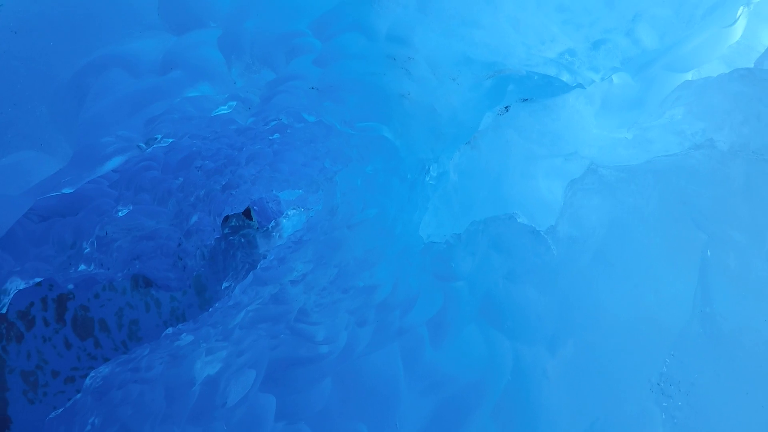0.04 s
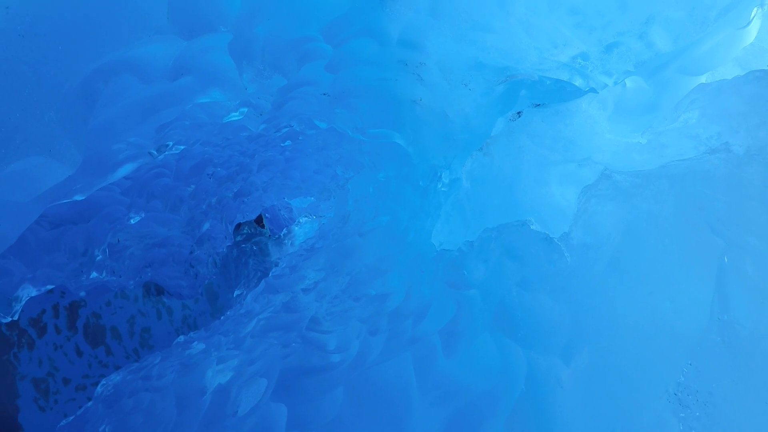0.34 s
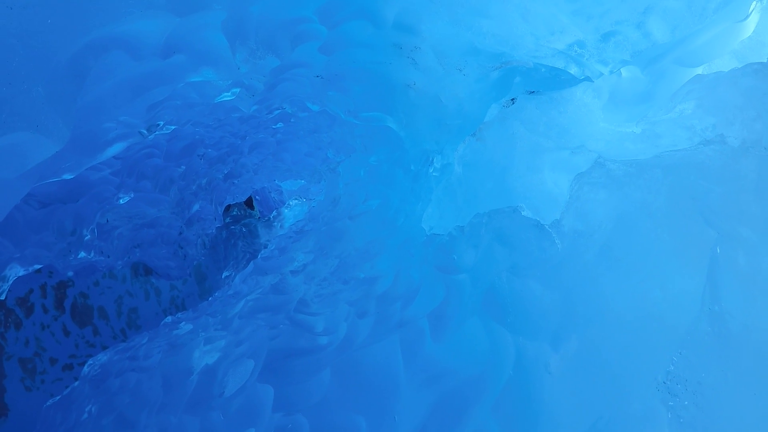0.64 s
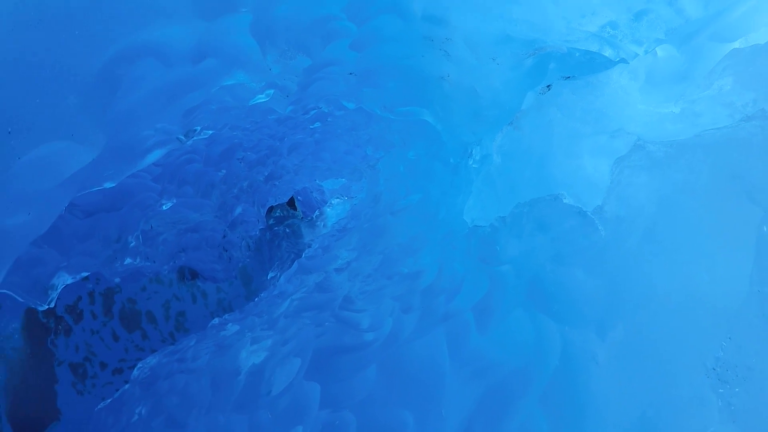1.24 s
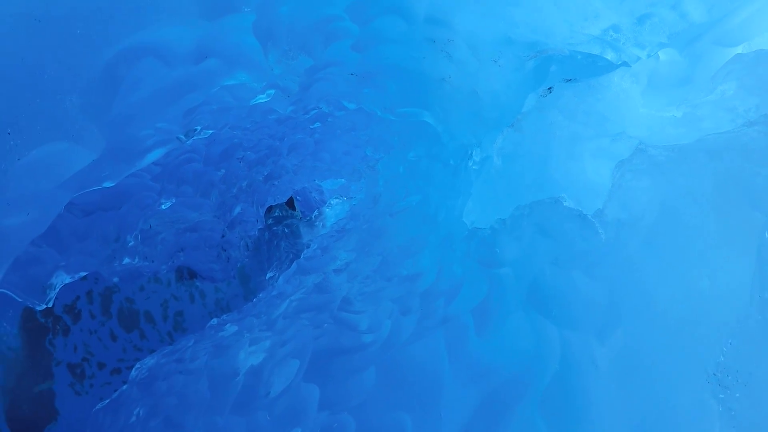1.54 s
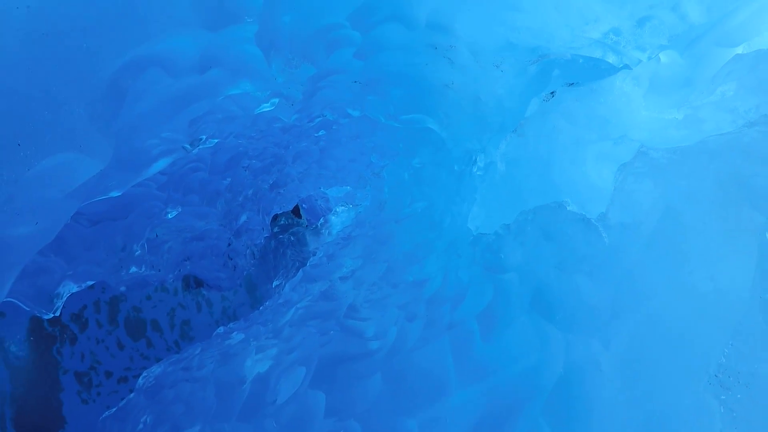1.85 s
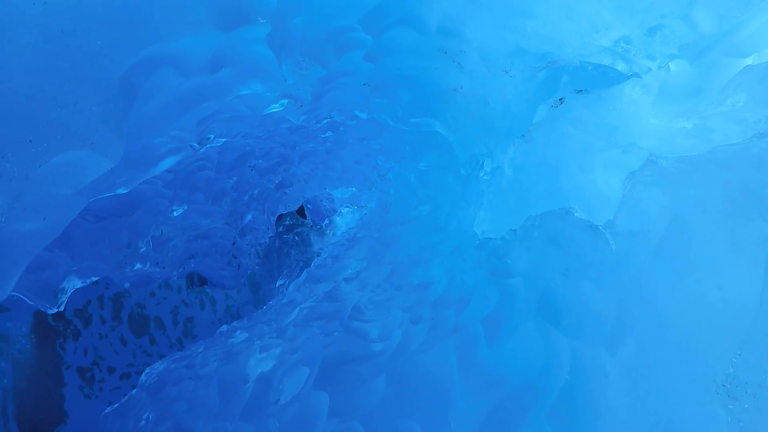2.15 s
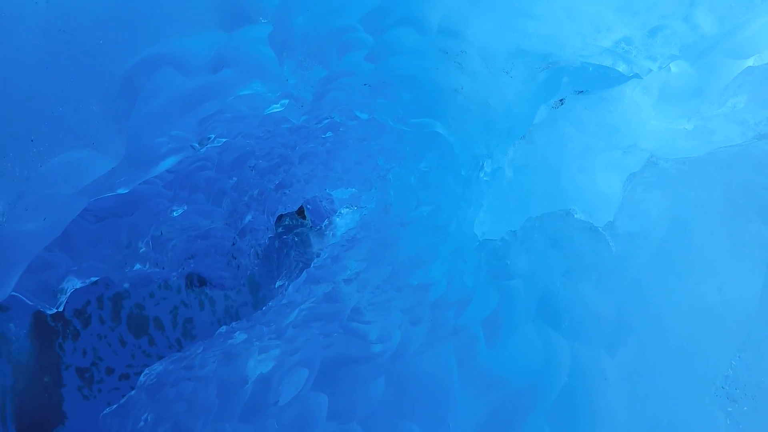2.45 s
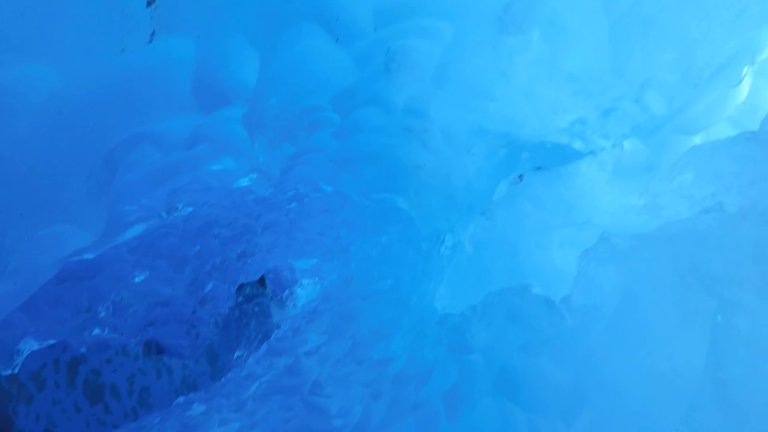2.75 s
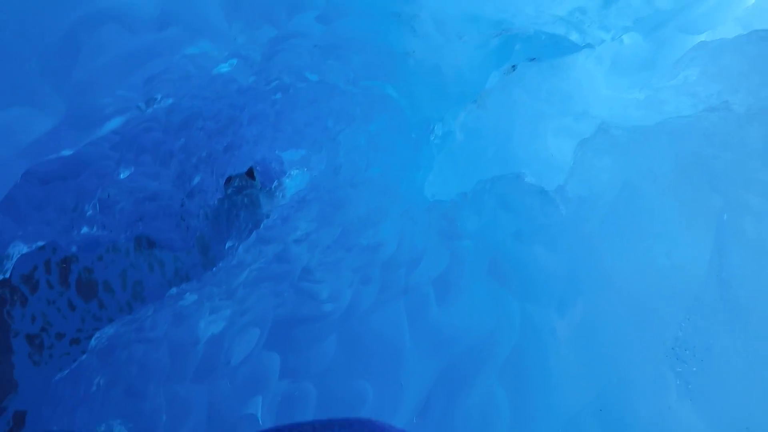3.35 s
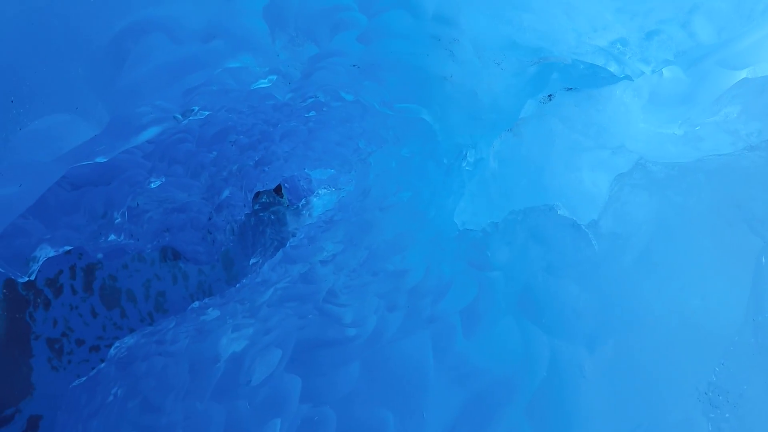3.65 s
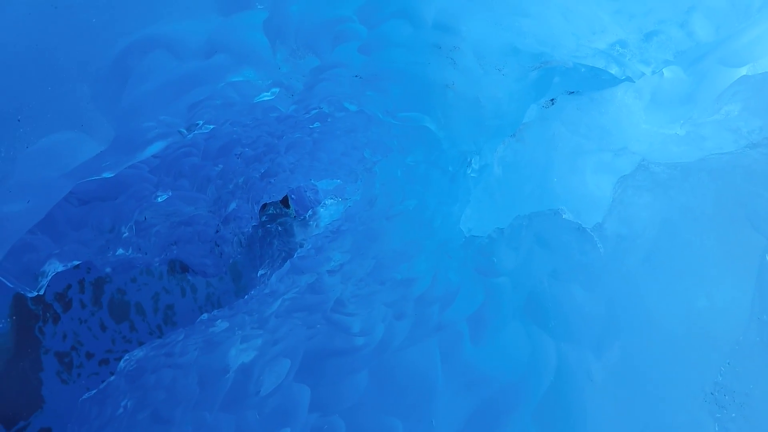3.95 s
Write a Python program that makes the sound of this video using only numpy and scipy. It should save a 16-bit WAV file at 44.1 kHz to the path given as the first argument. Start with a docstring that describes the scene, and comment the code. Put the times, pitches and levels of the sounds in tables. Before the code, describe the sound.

Meltwater trickles in an ice cave as a steady hiss of tiny droplets. Closer drips spatter with a short echo, clearest around 0.9 and 1.4 seconds, then lightly until 3.5. The handheld microphone rumbles throughout, with a low thump at the start and softer bumps near 1 and 4 seconds. Faint rubbing and dull finger knocks come and go, and small dry ticks cluster around 2, 2.5 and 3.7 seconds.

```python
"""Inside an ice cave, meltwater runs and drips. Countless far droplets make a steady hiss, some
ringing briefly at their own pitch; nearer drips burst into spatter that echoes off the ice.
The microphone is carried by hand: tremor and shifting grip give rumble, shudder and soft bumps,
and its hollow case rings with rubbing, dull finger knocks and small dry ticks."""
import sys
import numpy as np
from scipy import signal
from scipy.fft import rfft, irfft
from scipy.io import wavfile

SR = 44100
rng = np.random.default_rng(int(sys.argv[2]) if len(sys.argv) > 2 else 0)


def unload_wav(signal):
    """Save mono or channel-first audio to the path in sys.argv[1] as 16-bit WAV at rate SR, clipped to [-1, 1]."""
    wavfile.write(
        sys.argv[1],
        SR,
        np.round(np.clip(np.atleast_2d(signal).T, -1, 1) * 32767).astype(np.int16),
    )


N = 176400
TIME = np.arange(N) / SR
FFT_SIZE = 2 ** 18
FREQS_HZ = np.maximum(np.arange(FFT_SIZE // 2 + 1) * SR / FFT_SIZE, 1)


def from_db(db):
    """Decibels to gain."""
    return 10 ** (np.asarray(db) / 20)


def unit_rms(x):
    """Scale to unit rms."""
    return x / np.sqrt(np.mean(x ** 2) + 1e-20)


def envelope(rows):
    """Gain over time from (s, dB) rows."""
    return from_db(np.interp(TIME, *np.transpose(rows)))


def spectrum_db(rows):
    """Level at every frequency from (Hz, dB) rows."""
    hz, db = np.transpose(rows)
    return np.interp(np.log(FREQS_HZ), np.log(hz), db)


def colour(x, shape_db):
    """Minimum-phase filter of the given shape; white noise keeps its power."""
    gain = unit_rms(from_db(shape_db))
    cepstrum = irfft(np.log(gain + 1e-6))
    cepstrum[1:FFT_SIZE // 2] *= 2
    cepstrum[FFT_SIZE // 2 + 1:] = 0
    return irfft(rfft(x, FFT_SIZE) * np.exp(rfft(cepstrum)))[:N]


def drift(rate_hz):
    """Slow random motion, unit rms."""
    lowpass_db = -40 * np.log10(1 + (FREQS_HZ / rate_hz) ** 2)
    return unit_rms(colour(rng.standard_normal(FFT_SIZE), lowpass_db))


def grains(per_s, spread_db):
    """Random clicks of uneven size and sign, unit rms."""
    sizes = from_db(spread_db * np.minimum(rng.exponential(1, N), 4))
    signs = rng.choice([-1, 1], N)
    return unit_rms(sizes * signs * (rng.random(N) < per_s / SR))


def ring(clicks, hz, t60_s):
    """One damped mode; a unit click rings it at height 1."""
    r, w = np.exp(-np.log(1000) / (t60_s * SR)), 2 * np.pi * hz / SR
    return signal.lfilter([1, -r * np.cos(w)], [1, -2 * r * np.cos(w), r * r], clicks + 1e-18)


def soften(x, low_hz=300, high_hz=2200):
    """Small contacts on the case have neither bass nor treble."""
    lowpass = signal.butter(4, high_hz, fs=SR, output="sos")
    highpass = signal.butter(2, low_hz, "high", fs=SR, output="sos")
    return signal.sosfilt(np.vstack([lowpass, highpass]), x)


# Hand tremor spectrum. Each row: frequency in Hz, relative density in dB.
TREMOR_SPECTRUM = [(22, -8.5), (31, -4), (42, -9.5), (60, -15.5), (100, -33), (700, -75)]
# Tremor strength. Each row: time in seconds, level in dB.
TREMOR_LEVELS = [(.3, -37), (.8, -40.5), (1.25, -31), (1.6, -36), (2.1, -37.5), (2.8, -32), (3.1, -40.5),
                 (3.5, -31.5)]


def hand_tremor():
    """The carrying hand trembles: a continuous low rumble."""
    rumble = colour(rng.standard_normal(FFT_SIZE), spectrum_db(TREMOR_SPECTRUM))
    return envelope(TREMOR_LEVELS) * unit_rms(rumble)


# Grip shudder spectrum. Each row: frequency in Hz, relative density in dB.
GRIP_SPECTRUM = [(40, -7), (100, 5), (150, -7), (240, -14.5), (350, -21.5), (480, -19), (2000, -115)]
# Shudder strength. Each row: time in seconds, level in dB.
GRIP_LEVELS = [(.05, -52), (.075, -33), (.19, -53), (.58, -48), (.88, -57), (.98, -42), (1.08, -48),
               (1.33, -40), (1.45, -52), (1.72, -58), (1.75, -39), (1.84, -54), (2.1, -60), (2.52, -57),
               (2.63, -47), (2.9, -41), (3.03, -54), (3.24, -60), (3.35, -40), (3.46, -52), (3.91, -53),
               (3.97, -40)]


def grip_shudder():
    """The grip shifts in small jolts: a low, lumpy shudder."""
    jolts = grains(per_s=220, spread_db=3.0)
    return envelope(GRIP_LEVELS) * unit_rms(colour(jolts, spectrum_db(GRIP_SPECTRUM)))


# Hand bumps. Each row: start in seconds, level in dB, pitch in Hz, rise in seconds.
HAND_BUMPS = [(0.071, -6.5, 32, 0.019), (0.067, -18.5, 77.4, 0.0045), (0.98, -16, 38, 0.0095),
              (1.131, -26.5, 60.5, 0.0042), (1.259, -24.5, 26.2, 0.018), (2.751, -29, 55, 0.0088),
              (3.495, -30.5, 97, 0.0047), (3.963, -25, 87, 0.033)]


def hand_bumps():
    """Each soft bump is a low sine that swells and dies away."""
    out = 0
    for start_s, db, hz, rise_s in HAND_BUMPS:
        age_s = np.maximum(TIME - start_s, 0)
        swell = age_s / rise_s * np.exp(1 - age_s / rise_s)
        out += from_db(db) * swell * np.sin(2 * np.pi * hz * age_s)
    return out


# Case modes under the rubbing hand. Each row: frequency in Hz, gain in dB, T60 in seconds.
RUB_MODES = [(463, -6.5, 0.023), (600, -7.5, 0.046), (739, -5, 0.02), (1384, 2, 0.0062)]
# Rubbing pressure. Each row: time in seconds, level in dB.
RUB_LEVELS = [(.055, -66), (.08, -49), (.17, -70), (.33, -64), (.49, -52.5), (.77, -64), (.98, -57),
              (1.17, -64), (1.31, -54), (1.42, -68), (1.73, -69), (1.76, -53), (1.84, -67), (2.52, -67),
              (2.65, -54.5), (2.93, -48.5), (3.08, -62), (3.29, -62), (3.365, -46.5), (3.48, -62)]


def case_rub():
    """Dense tiny slips ring the case, following the hand's pressure."""
    slips = grains(per_s=3500, spread_db=4)
    body = sum((-1) ** k * from_db(db) * ring(slips, hz, t60_s)
               for k, (hz, db, t60_s) in enumerate(RUB_MODES))
    return envelope(RUB_LEVELS) * unit_rms(soften(body))


# Finger knocks. Each row: start in seconds, level in dB.
FINGER_KNOCKS = [(.084, -43), (0.9448, -39.5), (.977, -45), (.989, -36), (1.036, -41), (1.078, -48),
                 (1.3271, -39), (1.498, -45), (1.7412, -39.5), (1.754, -36.5), (2.755, -43), (3.371, -34.5),
                 (3.497, -44)]
# Hollow body modes. Each row: frequency in Hz, gain in dB, T60 in seconds.
KNOCK_MODES = [(134, -0.5, 0.12), (488, 1.5, 0.028), (646, -6, 0.014)]


def case_knocks():
    """Soft fingertips strike the hollow body, each with a slightly different mix of its modes."""
    starts_s, levels_db = np.transpose(FINGER_KNOCKS)
    out = 0
    for hz, mode_db, t60_s in KNOCK_MODES:
        scatter_db = rng.standard_normal(len(starts_s))
        clicks = np.zeros(N)
        clicks[(starts_s * SR).astype(int)] = from_db(levels_db + mode_db + scatter_db)
        out += ring(clicks, hz, t60_s)
    return soften(out, low_hz=88, high_hz=720)


# Dry ticks. Each row: start in seconds, level in dB, ring pitch in Hz, relative snap gain in dB.
DRY_TICKS = [(0.075, -25.5, 407, -8), (.413, -37.5, 670, -1.5), (0.673, -37.5, 647, -2.5),
             (1.889, -48, 770, 7), (2.0235, -32, 775, -7), (2.0421, -34, 600, 0), (2.483, -33.5, 770, 2),
             (2.4945, -33.5, 760, -5), (2.511, -34, 620, -7), (2.659, -35.5, 536, -2.5),
             (2.754, -35, 676, -7), (3.414, -40.5, 820, 1.5), (3.5801, -44, 844, 11.5),
             (3.586, -29, 720, -8), (3.612, -40.5, 760, 1), (3.705, -32.5, 754, -2), (3.7142, -30, 746, -1),
             (3.7207, -42, 765, -1)]
# Upper modes of the snap. Each row: frequency in Hz, gain in dB, T60 in seconds.
SNAP_MODES = [(1200, -6, 0.018), (1394, 3.5, 0.011), (1720, 13, 0.0018)]


def case_ticks(ref_hz=760, ref_t60_s=0.03):
    """A hollow ring with a brief snap on top; lower ticks are softer contacts and die sooner."""
    out = 0
    for start_s, db, hz, snap_db in DRY_TICKS:
        click = np.zeros(N)
        click[int(start_s * SR)] = from_db(db)
        out += ring(click, hz, ref_t60_s * (hz / ref_hz) ** 0.76)
        for k, (mode_hz, mode_db, t60_s) in enumerate(SNAP_MODES):
            gain = from_db(snap_db + mode_db + rng.standard_normal())
            out -= (-1) ** k * gain * ring(click, mode_hz, t60_s)
    return soften(out)


def cave_echo(x, wet_db, t60_s=0.57, delay_s=0.004):
    """Add the dense, short echo of the ice walls."""
    tail = rng.standard_normal(N) * np.exp(-np.log(1000) * TIME / t60_s) * (TIME > delay_s)
    tail /= np.sqrt(np.sum(tail ** 2))
    return x + from_db(wet_db) * signal.fftconvolve(x, tail)[:N]


# Meltwater spectrum. Each row: frequency in Hz, relative density in dB.
WATER_SPECTRUM = [(150, -10.5), (380, -16.5), (540, -3), (760, -11), (950, -11.5), (1400, -1.5), (1950, -4),
                  (2380, 5.5), (2750, 2.5), (3200, 3), (3600, 0), (5700, -4.5), (7000, -8.5), (8800, -17),
                  (10700, -16.5), (12000, -23.5), (15000, -31.5)]
# Narrow water resonances. Each row: centre in Hz, width in Hz, lift in dB.
WATER_RESONANCES = [(4870, 86, 3), (6190, 110, 4.5), (10400, 89, 2)]


def water_shape_db():
    """The water's broad spectrum plus its narrow resonances."""
    peaks_db = sum(db / (1 + (2 * (FREQS_HZ - hz) / width_hz) ** 2)
                   for hz, width_hz, db in WATER_RESONANCES)
    return spectrum_db(WATER_SPECTRUM) + peaks_db


def far_droplets(per_s=470, t60_cycles=8.8):
    """Far droplets ring briefly, each at its own pitch, and echo in the cave."""
    clicks = grains(per_s, spread_db=1)
    pitches_hz = np.geomspace(1400, 12000, 28)
    pitch_index = rng.integers(0, len(pitches_hz), N)
    rings = sum(hz ** 1.5 * ring(clicks * (pitch_index == k), hz, t60_cycles / hz)
                for k, hz in enumerate(pitches_hz))
    return unit_rms(colour(cave_echo(rings, wet_db=-1), water_shape_db()))


# Water flow. Each row: time in seconds, hiss level in dB.
FLOW_LEVELS = [(0, -49), (.43, -50), (.52, -47), (1.3, -48.5), (1.65, -49), (3.2, -50), (3.38, -49)]


def running_water(flicker_db=0.85, droplets_db=-7):
    """Countless droplets merge into a faintly flickering hiss, with single ones ringing in it."""
    noise = rng.standard_normal(N) * from_db(flicker_db * drift(rate_hz=13.8))
    hiss = colour(noise, water_shape_db())
    return envelope(FLOW_LEVELS) * (hiss + from_db(droplets_db) * far_droplets())


# Nearer drips. Each row: start in seconds, gain in dB, band centre in Hz, band width in octaves,
# spatter time scale in seconds.
NEAR_DRIPS = [(0.8985, -30.5, 6650, 0.45, 0.016), (0.989, -42, 2920, 0.22, 0.048),
              (1.247, -55, 11000, 0.31, 0.033), (1.416, -44.5, 6000, .4, 0.0098),
              (1.4425, -36.5, 5700, 0.66, 0.045), (1.443, -45.5, 10400, 0.13, 0.019),
              (1.607, -45.5, 5360, 0.46, 0.037), (1.662, -47, 9650, .8, 0.092),
              (1.766, -42.5, 3120, 0.5, 0.058), (1.95, -49, 7060, 0.64, 0.05),
              (2.181, -33.5, 2300, 0.15, 0.0034), (2.428, -43.5, 8500, 0.81, 0.0096),
              (2.625, -45, 3830, 0.92, 0.078), (2.923, -36.5, 7000, 1.6, 0.0016),
              (3.006, -42.5, 6200, 0.52, 0.0061), (3.244, -39, 2150, 0.38, 0.004),
              (3.279, -47, 6200, 0.35, 0.015), (3.365, -44, 6000, 0.68, 0.022),
              (3.459, -48, 9500, 0.65, 0.027)]


def near_drips(swell_s=0.75):
    """Each drip bursts into fading spatter that echoes off the ice; short ones snap, long ones swell."""
    out, water_db = 0, water_shape_db()
    for start_s, db, hz, octaves, length_s in NEAR_DRIPS:
        age_s = np.maximum(TIME - start_s, 0)
        rise_s, decay_s = length_s ** 2 / swell_s, 2 * length_s
        burst = (1 - np.exp(-age_s / rise_s)) * np.exp(-age_s / decay_s) / (1 + age_s / decay_s)
        spatter = burst * grains(per_s=3500, spread_db=3.2)
        band_db = -20 * np.log10(1 + (np.log2(FREQS_HZ / hz) / octaves) ** 2 / 2)
        out += from_db(db) * colour(spatter, water_db + band_db)
    return cave_echo(out, wet_db=-6.5)


def scene():
    """Water in the cave and handling close by, in mono."""
    water = running_water() + near_drips()
    case = case_ticks() + case_knocks() + case_rub()
    hand = hand_tremor() + grip_shudder() + hand_bumps()
    return (water + case + hand)[None]


def record(dry):
    """A steep low-pass cuts the top treble."""
    cutoff_hz = 15050
    return signal.sosfilt(signal.ellip(10, .1, 80, cutoff_hz, fs=SR, output="sos"), dry)


dry = scene()
out = record(dry)
unload_wav(out)
```